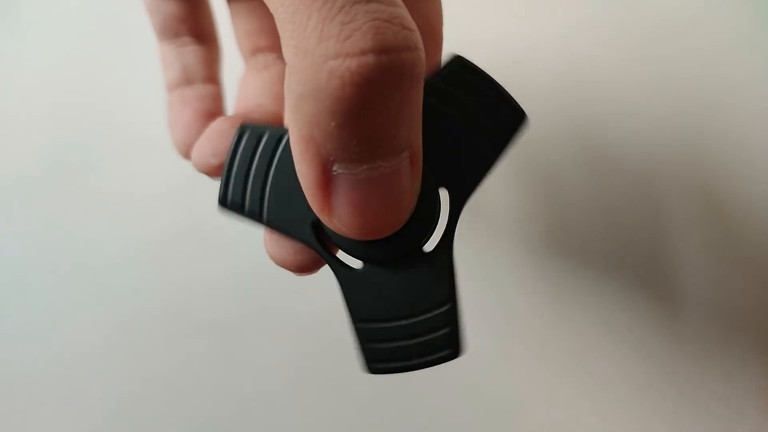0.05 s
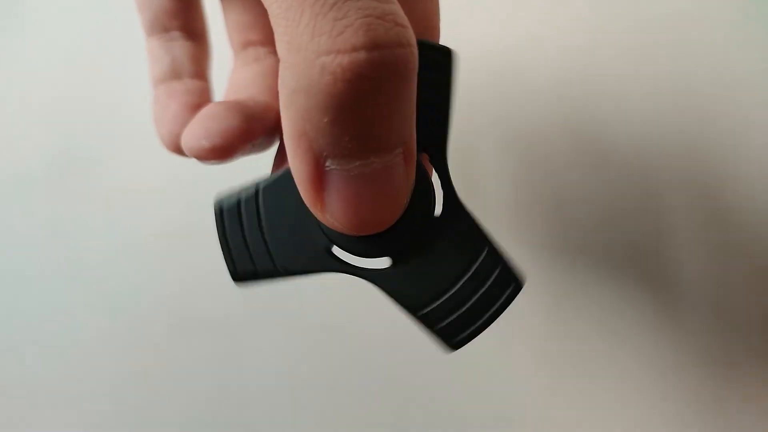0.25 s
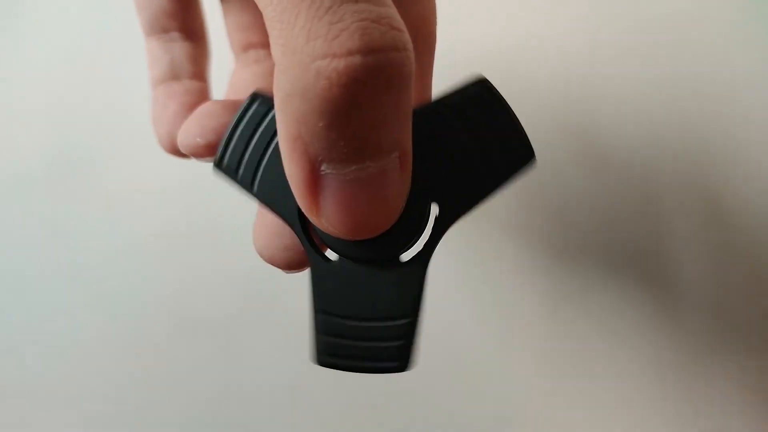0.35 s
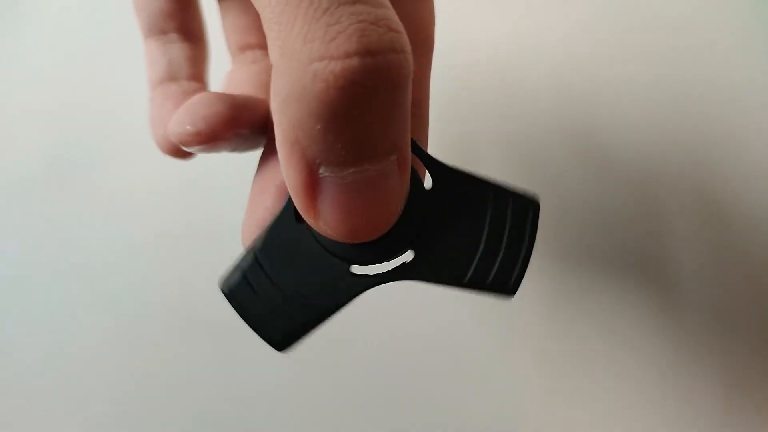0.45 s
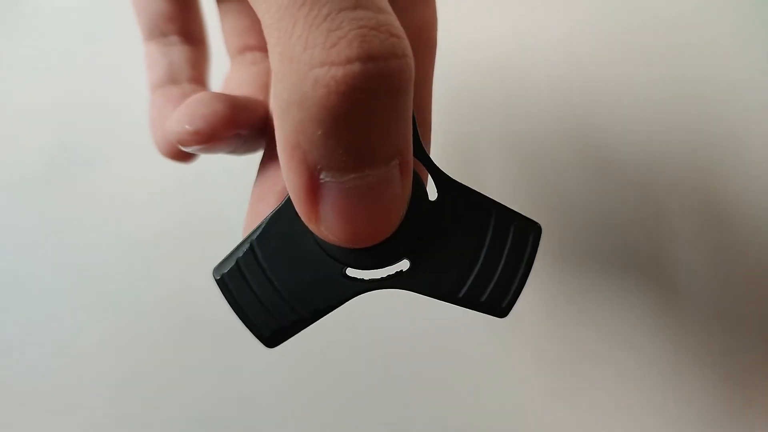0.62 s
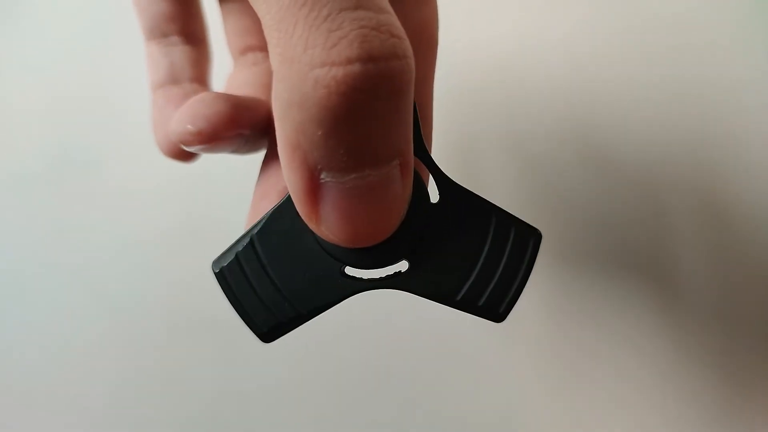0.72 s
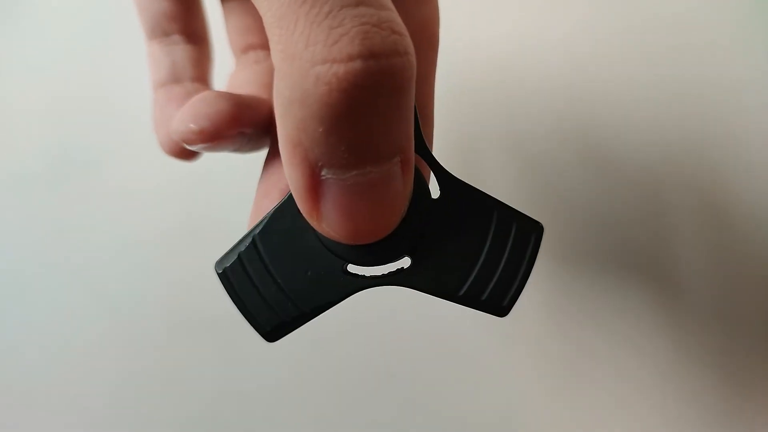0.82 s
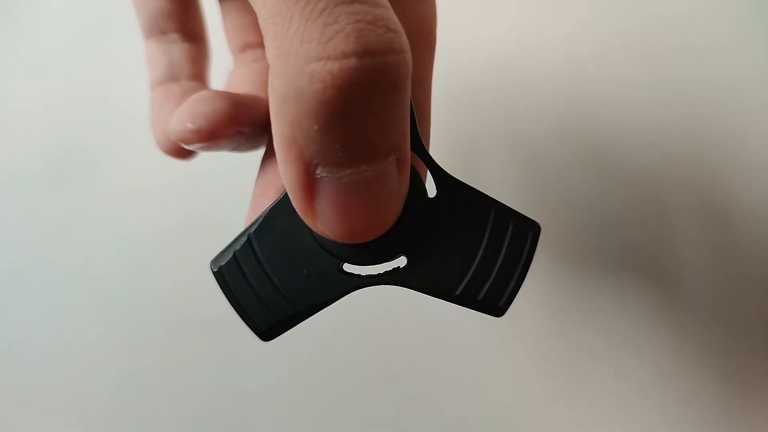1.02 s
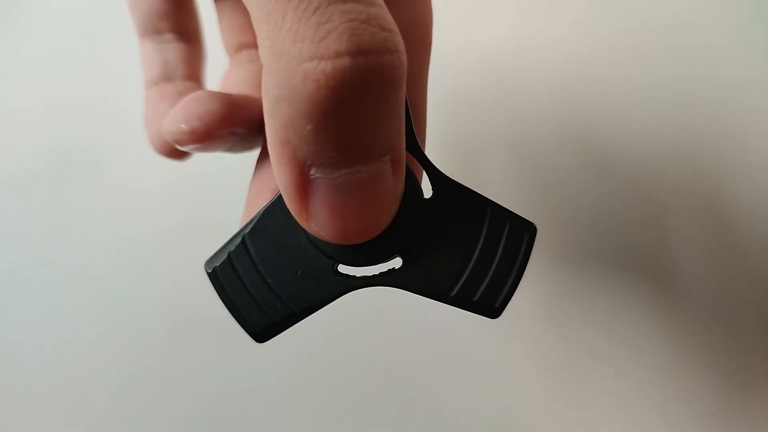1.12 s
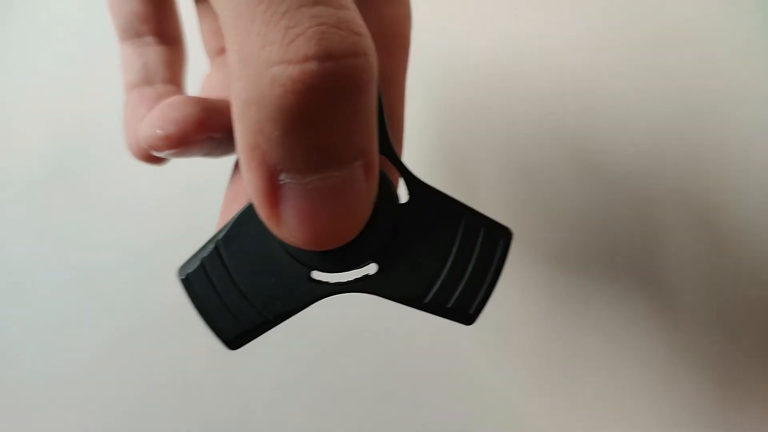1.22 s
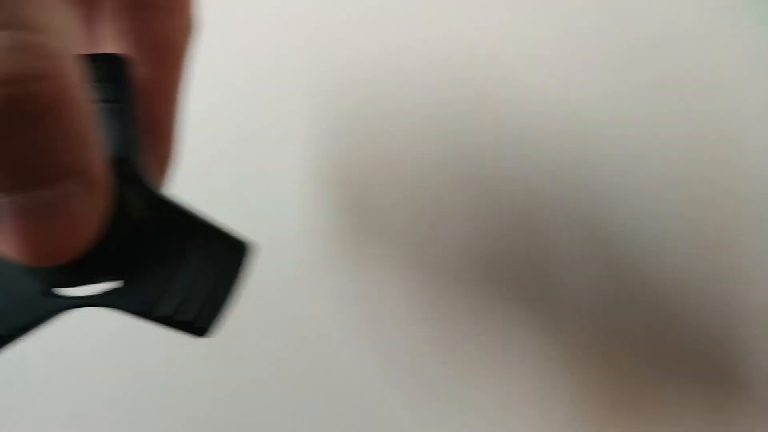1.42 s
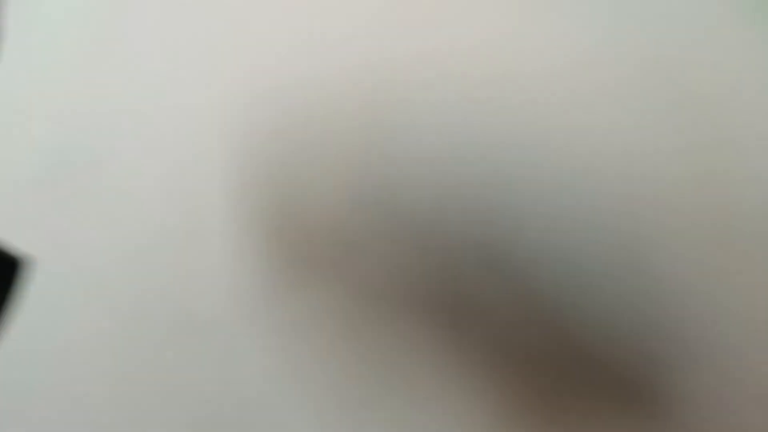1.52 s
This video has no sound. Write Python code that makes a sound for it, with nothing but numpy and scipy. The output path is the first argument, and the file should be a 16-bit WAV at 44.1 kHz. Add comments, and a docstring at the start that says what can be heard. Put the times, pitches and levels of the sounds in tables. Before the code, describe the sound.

A soft, dull bump from a hand holding a plastic spinner in a quiet room.

```python
"""One soft, dull bump while a hand holds a small plastic spinner close by in a quiet room.
A brief diffuse wash comes first, then a low boom of resonances that build and ring out in the room.
A few much fainter thuds follow, and the hand rustles and taps as it draws the toy away.
Steady room rumble and microphone hiss lie underneath."""
import sys
import numpy as np
from scipy import signal
from scipy.fft import rfft, irfft, next_fast_len
from scipy.io import wavfile
from scipy.ndimage import map_coordinates

SR = 44100
rng = np.random.default_rng(int(sys.argv[2]) if len(sys.argv) > 2 else 0)


def store_pcm(level_fs):
    """Save levels as 16-bit WAV."""
    pcm = np.round(np.clip(level_fs, -1, 1) * 32767).astype(np.int16)
    wavfile.write(sys.argv[1], SR, np.atleast_2d(pcm).T)


N = 68355

BUMP_S = 0.204
# Left-right likeness of the room's reverberation: freq_hz, correlation
ROOM_CORRELATION = [(60, 0.91), (150, 0.97), (370, .35), (900, -0.18), (2250, -0.21), (6000, 0.037)]


def boom():
    """Low resonances swell one after another behind the bump."""
    # Bump resonances: pitch_hz, level_db, lag_s, build_s, t60_s
    modes = [(39.55, -42, 0.0186, .04, .85), (72.2, -41.5, .028, .14, 0.48),
             (91.9, -38.5, .022, 0.035, 0.64), (146.4, -35, 0.061, 0.046, 0.42),
             (149.3, -43, 0.0019, 0.013, .22), (200.1, -46.5, .008, 0.031, 0.7),
             (212.4, -50.5, 0.004, 0.027, 0.56), (259.5, -56.5, 0.026, .07, 0.52),
             (332.3, -52.5, 0, 0.054, 0.61), (396.7, -62, 0.0061, 0.078, 0.65),
             (485.2, -62.5, 0.003, 0.054, 0.64), (1085, -58.5, .008, 0.029, 0.22)]
    return sum(amp(level_db) * ring(BUMP_S + lag_s, pitch_hz, build_s, t60_s, rough=0.28, flutter_hz=30)
               for pitch_hz, level_db, lag_s, build_s, t60_s in modes)


def wash():
    """Dense reflections of the bump; the treble dies first."""
    # Reflection spectrum: freq_hz, density_db
    spectrum = [(30, -13), (80, -2.5), (200, 0.5), (350, -11.5), (480, -13.5), (700, -15), (1100, -16),
                (1500, -22.5), (2700, -26.5), (5000, -39), (9000, -46), (14000, -76)]
    # Room decay: freq_hz, t60_s
    decay_times = [(80, 1), (300, 0.78), (800, 0.44), (2500, 0.46), (8000, 0.42)]
    level_db, rise_s, hold_s = -46.5, 0.027, 0.0074
    freq_hz, frame_s, frames = signal.stft(noise(spectrum, ROOM_CORRELATION), SR, nperseg=512)
    age_s = np.maximum(frame_s - BUMP_S - rise_s - hold_s, 0)
    decay = amp(-60 * age_s / log_interp(decay_times, freq_hz)[:, None])
    tail = signal.istft(frames * decay, SR, nperseg=512)[1][:, :N]
    return amp(level_db) * tail * np.sqrt(rise(clock() - BUMP_S, rise_s))


def thuds():
    """Soft contacts stir only the low resonances."""
    # Contacts: start_s, level_db, tilt_db_per_octave
    contacts = [(0.716, -60, -5.5), (.94, -57.5, 1), (1.0, -55.5, -1), (1.15, -64, 3.5), (1.25, -53, -.5)]
    # Thud resonances: pitch_hz, gain_db, build_s, t60_s
    modes = [(96.13, -0.5, 0.073, 0.65), (141.9, -7.5, 0.028, 0.42), (199.6, -7.5, 0.035, 0.44),
             (257.6, -28, .025, .3), (335, -22.5, .03, 0.19), (479, -22, 0.016, 0.24)]
    lowest_hz = modes[0][0]
    sound = np.zeros((2, N))
    for start_s, level_db, tilt_db_per_octave in contacts:
        for pitch_hz, gain_db, build_s, t60_s in modes:
            gain = amp(level_db + gain_db + tilt_db_per_octave * np.log2(pitch_hz / lowest_hz))
            sound += gain * ring(start_s, pitch_hz, build_s, t60_s, rough=0.28, flutter_hz=22)
    return sound


def hand_sway():
    """Deep swell as the hand leaves."""
    level_db, pitch_hz = -59, 39
    tone = np.sin(2 * np.pi * (pitch_hz * clock() + rng.random()))
    return amp(level_db) * swell(peak_s=1.447, sigma_s=0.07) * tone


def taps():
    """A soft knock and a plastic tick as the hand moves off."""
    # Contacts: start_s, pitch_hz, level_db, build_s, t60_s
    contacts = [(1.368, 262, -58.5, 0.027, 0.21), (1.53, 1880, -65, 0.0023, 0.066)]
    return sum(amp(level_db) * ring(start_s, pitch_hz, build_s, t60_s, rough=0.64, flutter_hz=70)
               for start_s, pitch_hz, level_db, build_s, t60_s in contacts)


def hand_rustle():
    """Short brushing strokes of the hand drawing away."""
    # Strokes: peak_s, level_db, sigma_s
    strokes = [(1.407, -69, 0.019), (1.474, -70.5, 0.0096), (1.526, -67, 0.035), (1.533, -67.5, 0.0032)]
    # Rubbing spectrum: freq_hz, density_db
    spectrum = [(140, 6.5), (500, -5), (1000, -11), (1900, -10), (3500, -13), (7500, -18.5), (14000, -31)]
    envelope = sum(amp(level_db) * swell(peak_s, sigma_s) for peak_s, level_db, sigma_s in strokes)
    return envelope * noise(spectrum, correlation=[(200, 0.58), (3000, 0.13)])


def room_rumble():
    """Steady low room noise, more alike left and right in the bass."""
    # Rumble spectrum: freq_hz, density_db
    spectrum = [(8, 6), (20, 3), (30, -9), (45, -5.5), (70, -10), (100, -12.5), (160, -15.5), (230, -16),
                (330, -24.5), (500, -26.5), (800, -31), (1500, -35), (3000, -40), (6000, -46), (10000, -59)]
    # Left-right likeness: freq_hz, correlation
    correlation = [(40, 0.64), (130, 0.4), (300, 0.13), (700, 0.051), (1500, 0), (3000, 0.011), (10000, 0)]
    return amp(-58) * noise(spectrum, correlation)


def microphone_hiss():
    """Near-white self-noise, independent in each channel."""
    # Hiss spectrum: freq_hz, density_db
    spectrum = [(100, -2), (3000, 1.5), (7000, -2), (10000, -4.5), (12000, 0), (14000, -0.5)]
    return amp(-78) * noise(spectrum, correlation=[(1000, 0)])


def ring(start_s, pitch_hz, build_s, t60_s, rough, flutter_hz):
    """One resonance builds and dies, wavering at random; higher ones differ more between the ears."""
    age_s = clock() - start_s
    knots = rng.standard_normal((2, 256))
    sin_flutter, cos_flutter = [map_coordinates(k, [clock() * flutter_hz], mode="wrap") for k in knots]
    spread_rad = stereo_angle(ROOM_CORRELATION, pitch_hz) * rng.choice([-1, 1])
    phase = 2 * np.pi * (pitch_hz * age_s + rng.random()) + np.array([[spread_rad], [-spread_rad]])
    tone = (1 + rough * sin_flutter) * np.sin(phase) + rough * cos_flutter * np.cos(phase)
    envelope = rise(age_s, build_s) * amp(-60 * np.maximum(age_s - build_s, 0) / t60_s)
    return tone * envelope / np.sqrt(1 + 2 * rough ** 2)


def noise(spectrum, correlation):
    """Stereo noise of rms 1 with a given spectral shape and left-right correlation."""
    def mid_side_gain(freq_hz):
        angle_rad = stereo_angle(correlation, freq_hz)
        return amp(log_interp(spectrum, freq_hz)) * [np.cos(angle_rad), np.sin(angle_rad)]

    mid, side = filtered(rng.standard_normal((2, N)), mid_side_gain)
    stereo = np.array([mid + side, mid - side])
    return stereo / np.sqrt(np.mean(stereo ** 2) + 1e-20)


def stereo_angle(correlation, freq_hz):
    """Mid-side angle in radians for a correlation curve."""
    return np.arccos(np.clip(log_interp(correlation, freq_hz), -1, 1)) / 2


def filtered(x, response):
    """Apply the gain response(freq_hz)."""
    size = next_fast_len(N + SR // 2)
    return irfft(rfft(x, size) * response(np.fft.rfftfreq(size, 1 / SR)), size)[..., :N]


def log_interp(points, freq_hz):
    """Read (freq_hz, value) points on a log frequency axis."""
    knots_hz, values = np.transpose(points)
    return np.interp(np.log(freq_hz + 1), np.log(knots_hz + 1), values)


def rise(age_s, length_s):
    """Smooth step from 0 to 1."""
    return np.sin(np.pi / 2 * np.clip(age_s / max(length_s, 1e-3), 0, 1)) ** 2


def swell(peak_s, sigma_s):
    """Gaussian envelope."""
    return np.exp(-0.5 * ((clock() - peak_s) / sigma_s) ** 2)


def amp(db):
    """Decibels to gain."""
    return 10 ** (np.asarray(db) / 20)


def clock():
    """Sample times in seconds."""
    return np.arange(N) / SR


def scene():
    """All sources, slightly to the right."""
    left_right_db = [[-0.25], [0.25]]
    mix = boom() + wash() + thuds() + hand_sway() + taps() + hand_rustle()
    return (mix + room_rumble() + microphone_hiss()) * amp(left_right_db)


def record(dry):
    """Brick-wall low-pass."""
    return filtered(dry, lambda freq_hz: freq_hz < 14300)


dry = scene()
out = record(dry)
store_pcm(out)
```